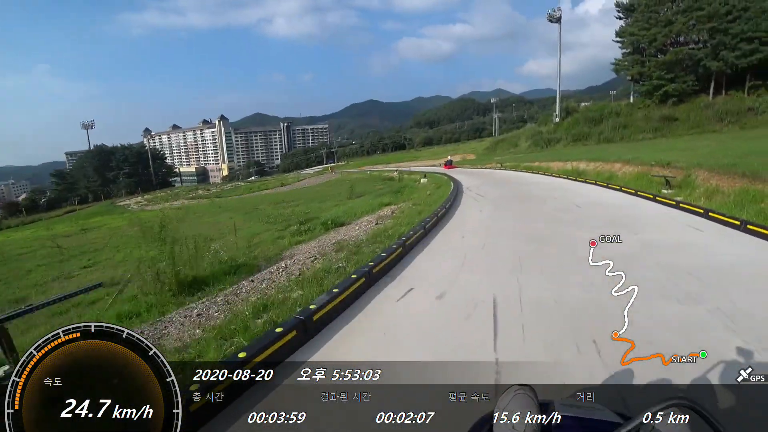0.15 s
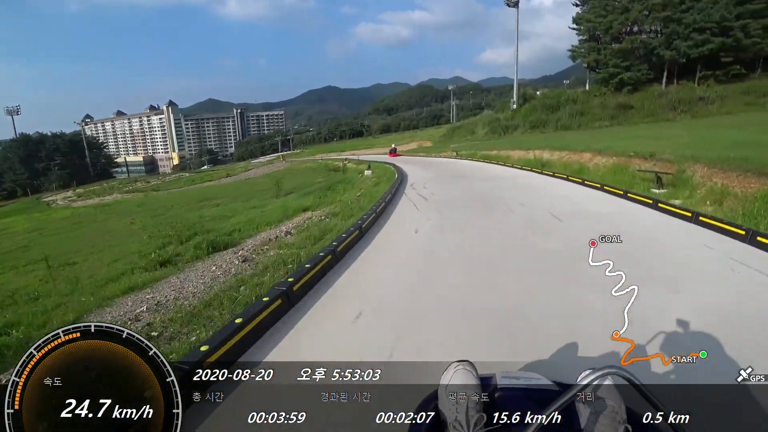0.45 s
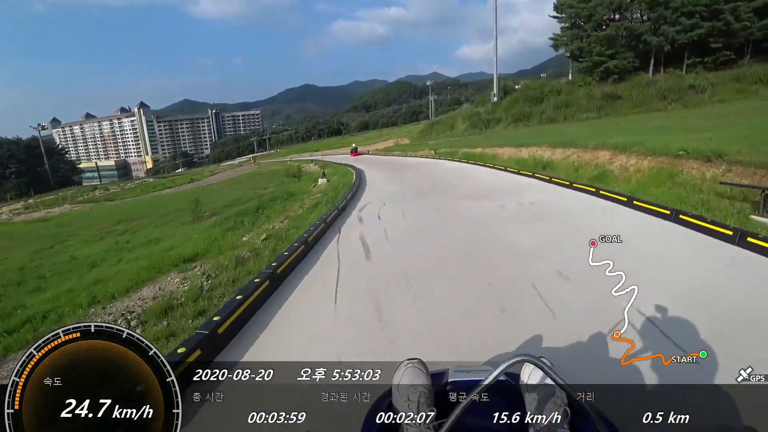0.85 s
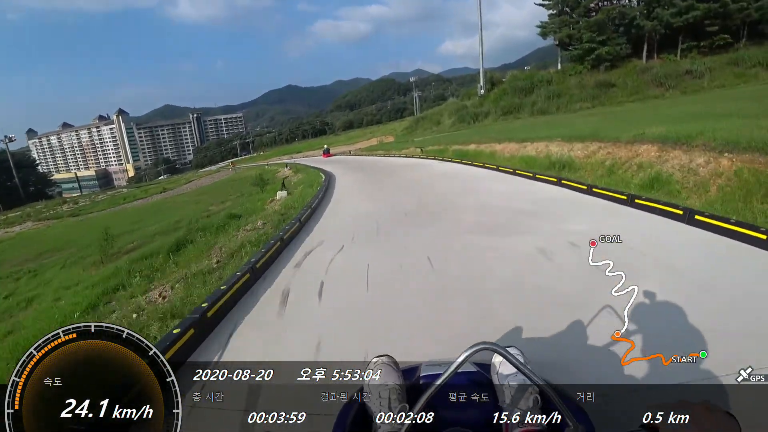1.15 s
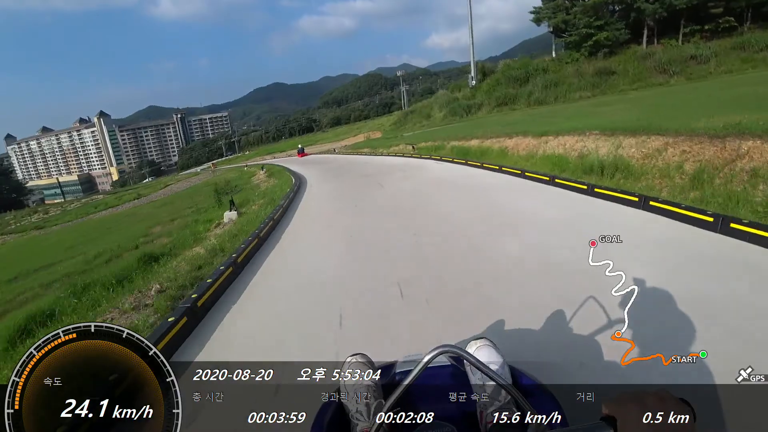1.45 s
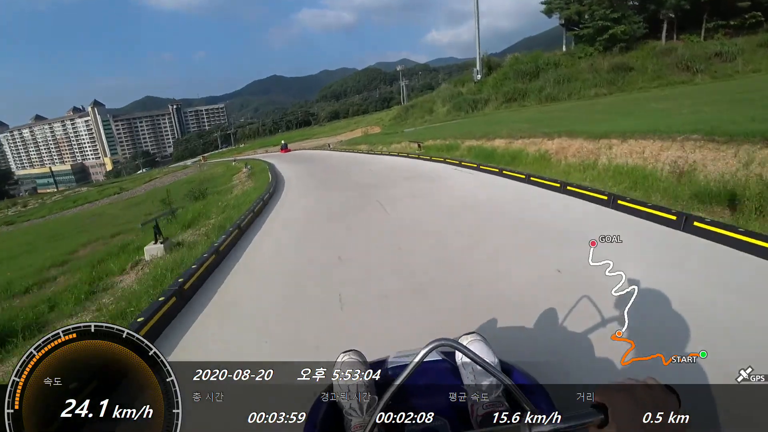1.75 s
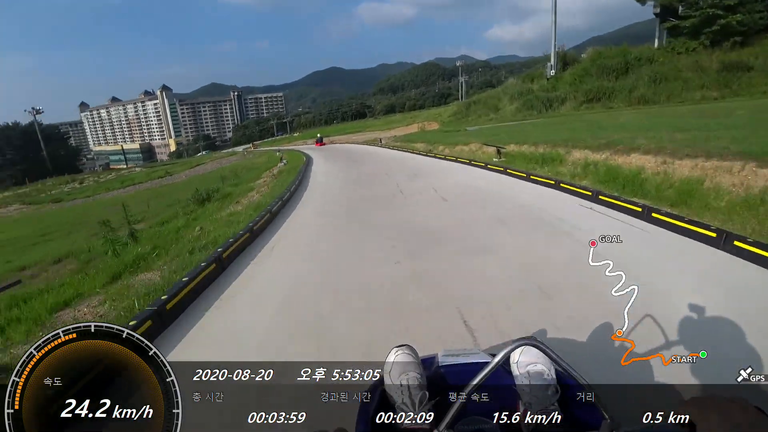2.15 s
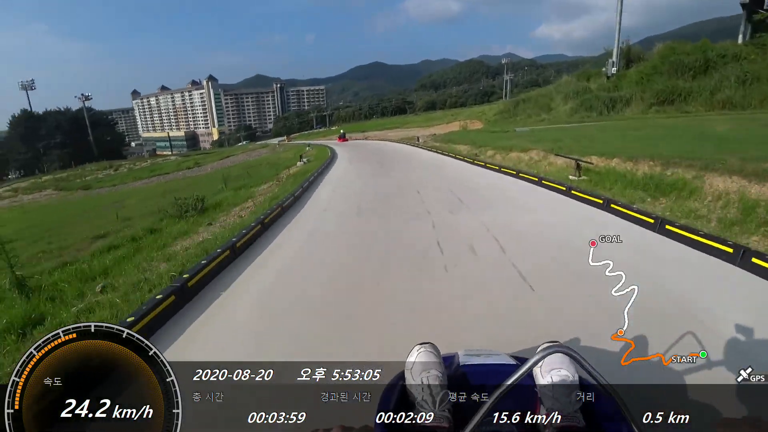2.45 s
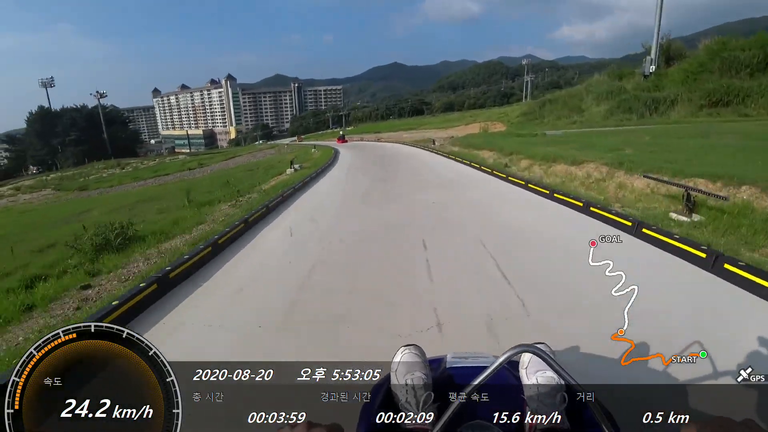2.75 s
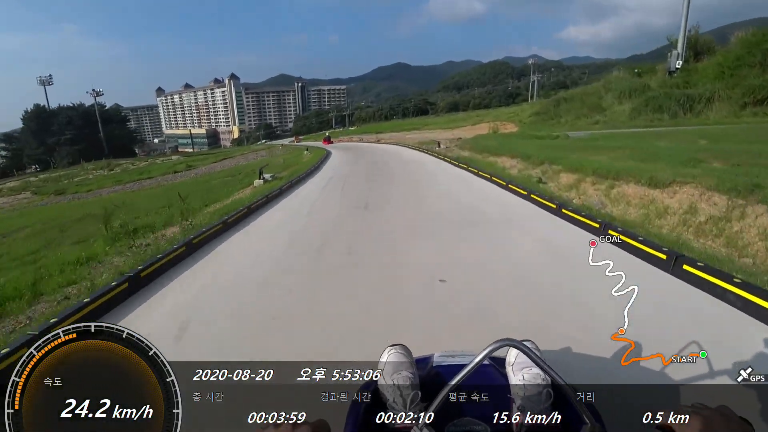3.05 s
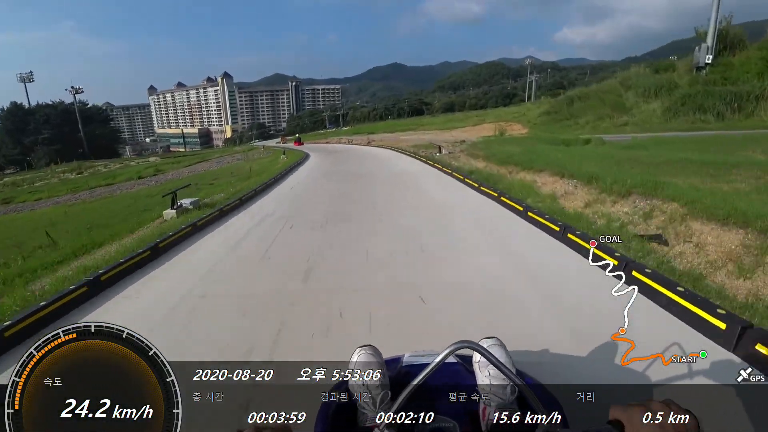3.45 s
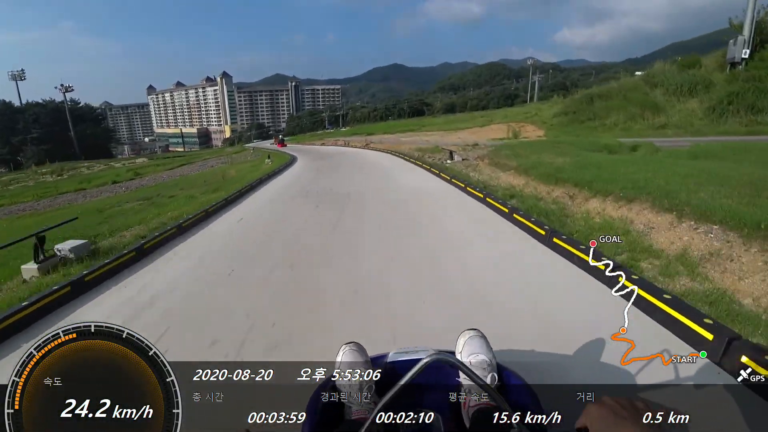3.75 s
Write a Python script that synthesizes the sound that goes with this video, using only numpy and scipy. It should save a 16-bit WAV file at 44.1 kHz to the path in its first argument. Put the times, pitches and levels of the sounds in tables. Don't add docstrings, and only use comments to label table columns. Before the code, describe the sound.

A plastic cart rolls down a concrete track outdoors, hull drumming, axle thumping and loose parts knocking, growing rougher and busier; a rider-worn microphone close by is buffeted by low gusty wind.

```python
import sys
import numpy as np
from scipy import signal
from scipy.fft import rfft, irfft, next_fast_len
from scipy.io import wavfile
from scipy.ndimage import uniform_filter1d, minimum_filter1d, map_coordinates

SR = 44100
rng = np.random.default_rng(int(sys.argv[2]) if len(sys.argv) > 2 else 0)


def elevation(decibels):
    levels = np.asarray(decibels, float)
    return 10 ** (levels / 20)


def wav_record(signal):
    frames = np.transpose(np.atleast_2d(signal))
    bounded = np.clip(frames, -1, 1)
    quanta = np.round(bounded * 32767).astype(np.int16)
    wavfile.write(sys.argv[1], SR, quanta)


N = 172872

# start_s [s], level_db [dB]
ROUGHNESS = [
    (0.0, -36),
    (1.0, -33),
    (1.55, -34),
    (2.7, -29),
    (3.92, -30),
]
RISE_S = 0.0012


def unit(x):
    return x / np.sqrt(np.mean(x ** 2) + 1e-20)


def along(points, hz):
    f, v = np.transpose(points)
    return np.interp(np.log(hz + 1), np.log(f + 1), v)


def curve(rows):
    return np.interp(np.arange(N) / SR, *np.transpose(rows))


def wobble(rate):
    return map_coordinates(rng.standard_normal(400), [np.arange(N) * rate / SR])


def swells(rows, t):
    return sum(elevation(db) * np.exp(-((t - s) / length) ** 2) for s, db, length in rows)


def filtered(x, response):
    m = next_fast_len(N + SR // 2)
    return irfft(rfft(x, m) * response(np.fft.rfftfreq(m, 1 / SR)), m)[..., :N]


def ringing(modes):
    def response(f):
        total = 0
        for k, (centre, width, db) in enumerate(modes):
            damping = 1j * f * width
            total = total + (-1) ** k * elevation(db) * damping / (centre * centre - f * f + damping)
        return total
    return response


def colour(points):
    return lambda f: elevation(along(points, f))


def noise(response):
    return unit(filtered(rng.standard_normal(N), response))


def bursts(times, gains, rise_s, fall_s):
    t = np.arange(-SR // 50, SR // 20) / SR
    shape = np.where(t < 0, np.exp(t / rise_s), np.exp(-t / fall_s))
    place = np.clip(((times + rise_s) * SR).astype(int), 0, N - 1)
    train = np.bincount(place, gains, N)
    return signal.fftconvolve(train, shape)[SR // 50:][:N]


def struck(envelope, response):
    raw = rng.standard_normal((2, N))
    return filtered(envelope * raw, response) / np.std(filtered(raw, response))


def wind():
    # start_s [s], level_db [dB]
    gust_levels = [(0, -22), (.2, -27), (.3, -20), (.38, -26), (.55, -17), (.63, -27), (.85, -19),
                   (1.3, -24), (1.55, -18), (1.74, -15), (2.15, -26), (2.35, -17), (2.5, -25), (2.65, -17),
                   (2.98, -19), (3.18, -31), (3.35, -16), (3.92, -20)]
    # middle_s [s], peak_db [dB], half_length_s [s]
    eddy_rows = [(.098, -10, .015), (.117, -11, .01), (.148, -6, .005), (.247, -10, .008), (.278, -12, .01),
                 (.408, -10, .02), (.552, -8, .012), (1.722, -7, .015), (1.83, -10, .01), (2.61, -9, .015),
                 (2.66, -13, .015), (2.775, -11, .008), (3.59, -11, .008)]
    # pitch_hz [Hz], level_db [dB per Hz]
    buffet_colour = [(12, -32.5), (20, -1.5), (122, 0.5), (254, 1), (399, -9), (1800, -41.5), (2340, -66.5),
                     (3960, -120)]
    eddies = swells(eddy_rows, np.arange(N) / SR)
    gust = elevation(curve(gust_levels) + 0.67 + 1.67 * wobble(29.94))
    thinned = noise(lambda f: colour(buffet_colour)(f) * (f / (f + 65j)) ** 2)
    apart = (gust + 0.52 * eddies) * thinned
    common = elevation(-4) * (gust + 0.33 * eddies) * noise(colour(buffet_colour))
    deep = noise(lambda f: f * 45 / (45 ** 2 + f * f) / (1 + (f / 90) ** 2))
    push = elevation(-26 + 4.5 * wobble(6.05)) * deep
    return common + push, apart


def tyre_hiss():
    # pitch_hz [Hz], level_db [dB per Hz]
    hiss_colour = [(470, -8.5), (800, -10.5), (883, -8.5), (1610, -19.5), (4630, -31.5), (9970, -44),
                   (11000, -64), (14300, -74), (22000, -120)]
    road_db = curve(ROUGHNESS)
    level_db = -42 + 0.96 * (road_db - road_db.mean())
    flutter_db = 1.2 * wobble(45) + 1.2 * wobble(80)
    return struck(elevation(level_db + flutter_db), colour(hiss_colour))


def hull_drum():
    # pitch_hz [Hz], width_hz [Hz], level_db [dB]
    hull_modes = [(55.4, 43.5, -6.5), (122.7, 17.14, 4.5), (173, 28.24, -0.5), (260.5, 37.6, 0.5),
                  (393.6, 131, -10.5), (550.4, 77, -11.5), (717, 82.6, -19)]
    level_db = curve(ROUGHNESS) + 15.5 + 2.64 * wobble(14) + 1.89 * wobble(50)
    return struck(elevation(level_db), ringing(hull_modes))


def hull_boom():
    # middle_s [s], level_db [dB], half_length_s [s]
    bumps = [(.7, -13, 0.058), (.78, -24.5, 0.03), (1.32, -9, 0.018), (1.5, -21.5, 0.088),
             (1.87, -15, 0.058), (2.55, -37.5, 0.1), (2.67, -14.5, 0.043), (2.92, -15, 0.091),
             (3.45, -19.5, 0.18), (3.85, -30, 0.053)]
    pitch_hz = 122.4 + 3.718 * wobble(8.2)
    turns = np.cumsum(pitch_hz) / SR
    return swells(bumps, np.arange(N) / SR) * np.sin(2 * np.pi * turns)


def axle_thumps():
    # start_s [s], peak_db [dB]
    thump_rows = [(0.0763, -28), (0.2421, -12), (0.2652, -11.5), (0.3897, -5), (0.4277, -14.5),
                  (0.5167, -23), (0.6008, -28), (0.6867, -28), (0.7233, -18.5), (0.7425, -28),
                  (0.7669, -14), (0.8315, -10), (1.0322, -18), (1.1189, -13.5), (1.1447, -11.5),
                  (1.2913, -8), (1.4029, -12), (1.7161, -11.5), (1.8386, -7.5), (1.8957, -4.5),
                  (1.9473, -7), (2.0497, -10.5), (2.1, -10.5), (2.3879, -9), (2.4367, -7), (2.5061, -3),
                  (2.5671, -6.5), (2.6631, -3.5), (2.7715, -9.5), (2.7997, -7.5), (2.8532, -3),
                  (3.0094, -13), (3.0943, -4.5), (3.1598, -6), (3.1907, -19.5), (3.278, -3.5),
                  (3.3476, -1.5), (3.4324, -4.5), (3.4936, -9.5), (3.6048, -4.5), (3.7028, -8),
                  (3.7264, -7), (3.775, -4.8), (3.8127, -8)]
    # pitch_hz [Hz], width_hz [Hz], level_db [dB]
    seat_modes = [(570, 130, 0), (700, 130, -3), (1150, 400, -22)]
    rebound_s = 0.004015
    s, db = np.transpose(thump_rows)
    luck = rng.random((len(s), 2))
    at = np.concatenate([s, s + rebound_s * (1 + luck[:, 0])]) * SR
    push = np.concatenate([elevation(db), elevation(db) * (luck[:, 1] - 1)])
    blows = np.bincount(at.astype(int), elevation(36) * push, N)
    return filtered(blows, lambda f: ringing(seat_modes)(f) / (1 + 1j * f / 1300) ** 3)


def linkage_chatter():
    # middle_s [s], level_db [dB], half_length_s [s], low modes over high_db [dB]
    spells = [(0.016, -46.5, 0.033, -8.5), (.18, -50, 0.019, -5.5), (0.491, -41, 0.01, -5),
              (.63, -54, 0.021, 11), (1.132, -46.5, 0.035, 4), (1.2, -39.5, 0.013, 4),
              (1.325, -38, 0.031, -2.5), (1.831, -46.5, 0.017, 1), (1.918, -45.5, 0.045, 6),
              (2.43, -38, 0.03, -1), (2.516, -34, 0.05, 0.5), (2.715, -49.5, 0.073, 10.5),
              (2.93, -44, 0.081, 4), (3.348, -43.5, 0.046, 2.5), (3.483, -42.5, 0.056, 3.5),
              (3.676, -52.5, 0.14, 8.5)]
    taps_per_s, spread_db, idle_db, fall_s = 400, 5, -69, 0.0021
    draw = rng.random((1900, 2))
    when = np.cumsum(-np.log(draw[:, 0])) / taps_per_s
    size = elevation(-4 + spread_db * (2 * draw[:, 1] - 3)) * (when < N / SR)
    high = [(mid_s, level, half_s) for mid_s, level, half_s, low_db in spells]
    low = [(mid_s, level + low_db, half_s) for mid_s, level, half_s, low_db in spells]
    high_taps = bursts(when, size * (swells(high, when) + elevation(idle_db)), RISE_S, fall_s)
    low_taps = bursts(when, size * (swells(low, when) + elevation(idle_db)), RISE_S, fall_s)
    return high_taps, low_taps


def loose_parts():
    # start_s [s], peak_db [dB], steel share [0-1]
    knocks = [(0.389, -22.5, 0), (0.431, -30.5, 0.1), (0.828, -25, 0), (1.02, -31.5, 0.8),
              (1.1098, -28, 0.3), (1.2147, -27.5, 0.3), (1.3145, -28.3, 0.8), (1.326, -25.5, 0.9),
              (1.4886, -29.5, 0), (1.6822, -28, 0.7), (1.7468, -36.5, 0.0), (1.773, -30.5, 0.0),
              (1.82, -30, 0.7), (1.889, -20, 0.0), (1.898, -25.5, 0.55), (1.924, -29.5, 0.95),
              (1.9458, -26, 0.9), (1.978, -29.5, 0.2), (2.0498, -25.5, 0), (2.1321, -27.5, 0.1),
              (2.2004, -29.5, 0.8), (2.314, -29.5, 0), (2.3887, -26, 0), (2.4373, -28, 0.2),
              (2.509, -22.5, 0.5), (2.5404, -29, 0.6), (2.6024, -27.5, 0.1), (2.6636, -24, 0.4),
              (2.7132, -27.5, 0.1), (2.744, -44, 1), (2.7736, -25.5, 0.5), (2.798, -28, 0.28),
              (2.8404, -29, 0.3), (2.8534, -24.5, 0.34), (2.8652, -32.5, 0.2), (2.8788, -28.5, 0.51),
              (2.895, -34, 0.47), (2.9056, -38.5, 0.81), (2.9299, -35.5, 0.55), (3.0085, -24.5, 0.5),
              (3.0967, -23.5, 0.76), (3.1598, -27.5, 0.5), (3.2775, -27.5, 0.95), (3.3132, -28, 0.9),
              (3.3346, -25.5, 0.7), (3.348, -17.5, 0.3), (3.4313, -27.5, 0.2), (3.4432, -21, 0.06),
              (3.461, -33.5, 0.2), (3.4731, -32, 0.95), (3.4953, -24, 0.7), (3.511, -28, 0.4),
              (3.59, -31, 0.2), (3.604, -27, 0), (3.6525, -32.5, 0), (3.711, -29, 0.2),
              (3.8425, -21.5, 0.6),
              (0.0157, -35, 0.8), (0.148, -34.5, 0.0), (0.1573, -40.0, 0.7), (0.171, -38, 0.7),
             (0.181, -41.5, 0.5), (0.1908, -33.5, 0.2), (0.241, -35, 0), (0.265, -39, 0), (0.282, -38.5, 0),
             (0.3235, -46, 0.0), (0.49, -39, 0.5), (0.514, -39.5, 0), (0.5485, -35, 0), (0.5957, -40, 0),
             (0.613, -30, 0.95), (0.6416, -44, 0), (0.7216, -38, 0), (0.7523, -34, 0.6),
             (0.7682, -36.8, 0.9), (1.084, -33.5, 0.5), (1.1255, -32, 0.72), (1.1476, -37, 0.4),
             (1.194, -41.5, 0.4), (1.243, -31, 0.84), (1.3488, -33.5, 0.8), (1.3563, -32.5, 0.6),
             (1.398, -33.5, 0), (1.404, -37.5, 0.1), (1.4722, -31, 0.52), (1.566, -35, 0.7),
             (1.605, -36, 0.4), (1.627, -36.5, 0.0), (1.7123, -32.5, 0), (1.7913, -36.5, 0.39),
             (1.8292, -35, 0.8), (1.8507, -32.6, 1), (2.0796, -38.5, 0.1), (2.1614, -31.5, 0),
             (2.288, -37, 0.0), (2.4032, -35.5, 0.2), (2.5707, -35.5, 0.6), (2.7303, -36, 0.41),
             (2.9825, -30, 0.9), (3.033, -33.5, 0), (3.0722, -38.5, 0.57), (3.1305, -39.5, 0.38),
             (3.2044, -40.5, 0.7), (3.2588, -43.5, 0.45), (3.271, -29.5, 0.1), (3.3758, -29, 0),
             (3.6416, -33.5, 0.1), (3.694, -34.8, 0.38), (3.7747, -29.5, 0.2), (3.8073, -32, 0),
             (3.8642, -38, 0.0),
              (2.491, -21, 0), (2.7, -34, .3), (3.401, -29.5, 0.04), (3.573, -33, 0), (3.727, -34, 0)]
    # pitch_hz [Hz], level_db [dB per Hz]
    crack_colour = [(300, -35.5), (800, 9.5), (1200, 5), (2500, -1.5), (5000, -9), (8000, -14),
                    (11000, -32), (16000, -39)]
    # pitch_hz [Hz], width_hz [Hz], level_db [dB]
    steel_modes = [(1880, 70, 7), (2965, 230, 4), (3865, 200, -4), (4550, 230, 2.5), (5094, 180, -2.5),
                   (5950, 150, -10), (7760, 240, -8.5), (9760, 400, -15)]
    # pitch_hz [Hz], width_hz [Hz], level_db [dB]
    panel_modes = [(980, 140, 0), (1330, 140, -3.5), (1950, 260, -5.5)]
    fall_s, snap_s, panel_fall_s = 0.0045, 0.0013, 0.0074
    s, db, share = np.transpose(knocks)
    chatter, low_chatter = linkage_chatter()

    blow = elevation(db - 7.5) * np.sqrt(1 - share)
    scrape = bursts(s, blow, RISE_S, fall_s)
    snap = bursts(s, blow, snap_s / 2, snap_s)
    crack = struck(scrape + snap + elevation(-18) * chatter, colour(crack_colour))
    panel = struck(bursts(s, blow * elevation(-1.5), RISE_S, panel_fall_s), ringing(panel_modes))

    contact = bursts(s, elevation(db - 8.5) * np.sqrt(share), RISE_S, fall_s)
    low_steel = struck(0.8 * contact + low_chatter, ringing(steel_modes[:2]))
    high_steel = struck(contact + chatter, ringing(steel_modes[2:]))
    return crack + panel + elevation(-2) * (low_steel + high_steel)


def scene():
    # pitch_hz [Hz], level_db [dB]
    width_colour = [(60, -21.5), (700, -11.5), (1100, -8.5), (2500, -8), (6000, -7.5), (11000, -5.5)]
    common, buffet = wind()
    rolling = tyre_hiss() + hull_drum() + hull_boom()
    cart, other = rolling + axle_thumps() + loose_parts()
    mid = cart + common
    left_lean = 0.054
    side = filtered(other, colour(width_colour)) + buffet + left_lean * mid
    return np.array([mid + side, mid - side])


def roll_off(x):
    return signal.sosfilt(signal.butter(12, 11270, fs=SR, output="sos"), x)


def record(dry):
    ceiling, hold_s, top_hz = 0.51, 0.01, 11010
    mid, side = (dry[0] + dry[1]) / 2, (dry[0] - dry[1]) / 2
    need = np.minimum(1, ceiling / (np.abs(mid) + 1e-9))
    size = int(hold_s * SR)
    gain = uniform_filter1d(minimum_filter1d(need, 2 * size), size)
    limited = gain * np.array([mid + side, mid - side])
    pair = filtered(limited, lambda f: f < top_hz)
    return roll_off(np.clip(pair, -1, 1))


dry = scene()
out = record(dry)
wav_record(out)
```